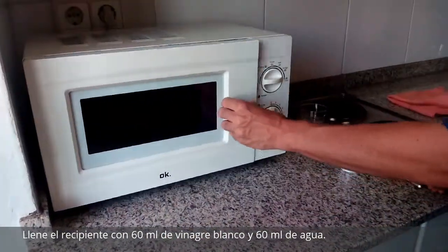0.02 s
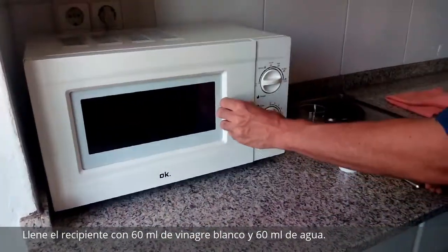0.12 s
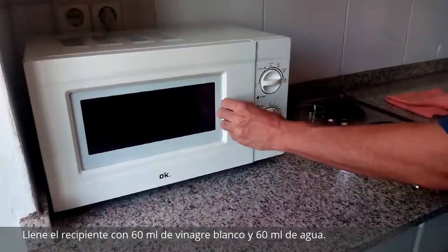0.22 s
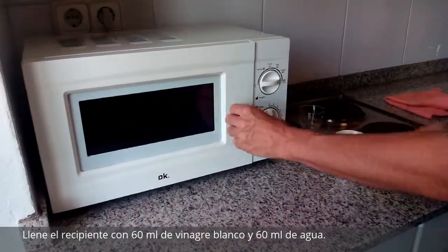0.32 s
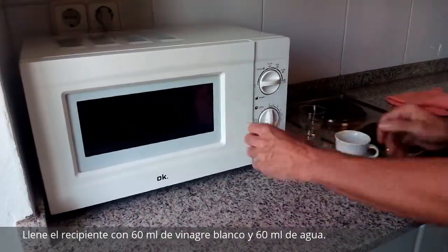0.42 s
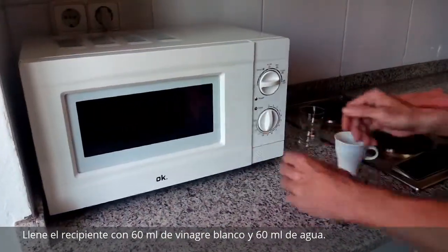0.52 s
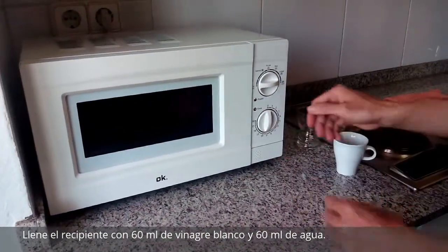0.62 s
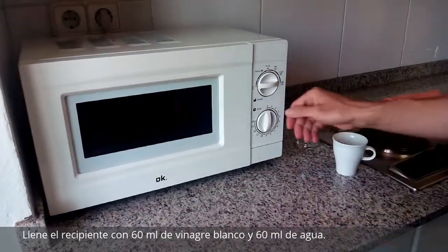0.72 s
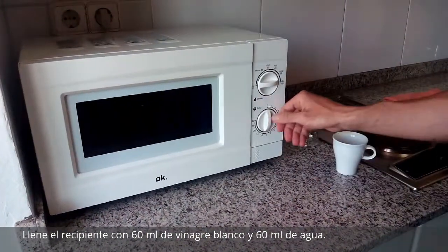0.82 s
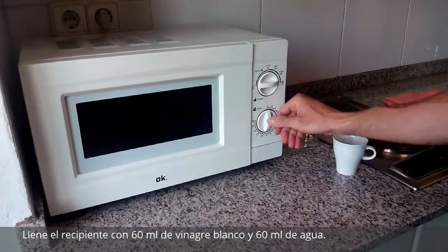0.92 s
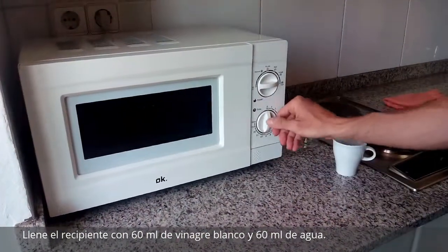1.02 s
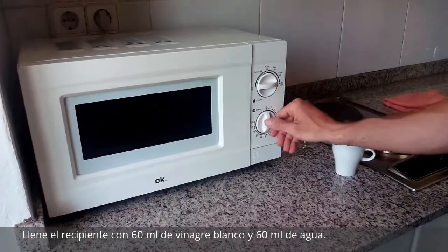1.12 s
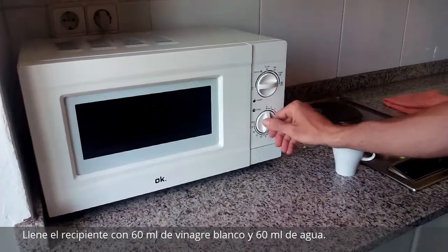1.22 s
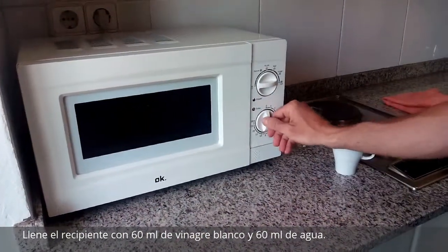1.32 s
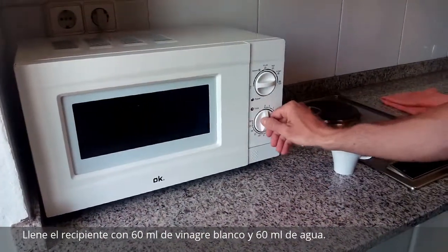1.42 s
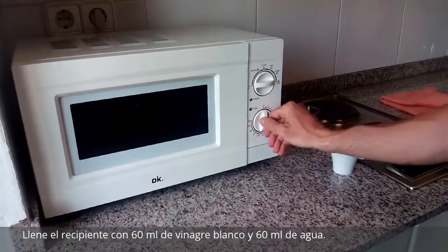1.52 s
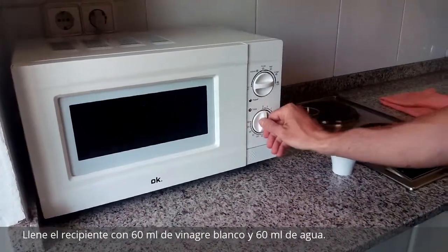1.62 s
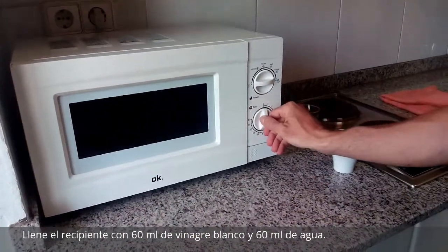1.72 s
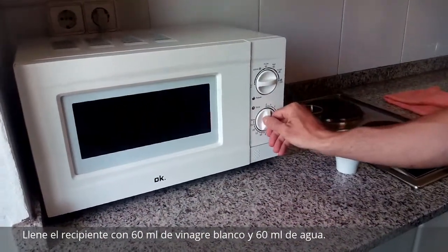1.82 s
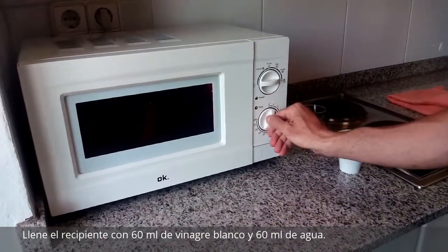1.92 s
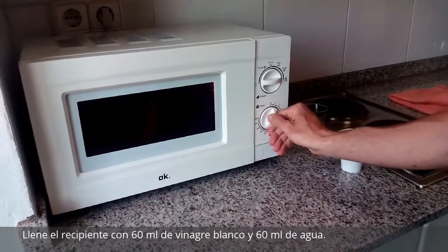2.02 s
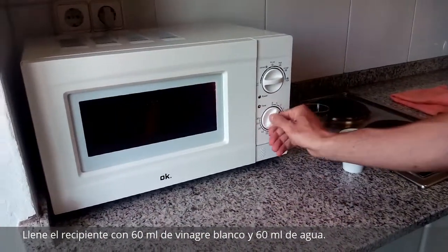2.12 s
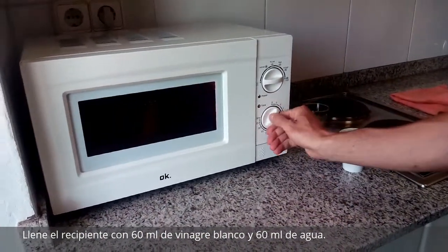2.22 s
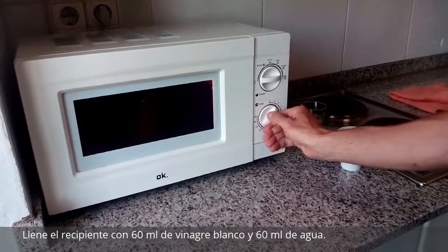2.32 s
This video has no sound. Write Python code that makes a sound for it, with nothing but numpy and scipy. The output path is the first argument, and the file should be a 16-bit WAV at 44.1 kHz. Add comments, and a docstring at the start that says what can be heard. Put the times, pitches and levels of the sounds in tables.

```python
"""The fading tail of an earlier knock is heard first, over the noise floor of a tiled kitchen.
A microwave door is pushed shut: noise cracks for seal and latch, hook knocks, then steel modes ring into the room.
A hand taps the timer knob, rung as plastic modes, and turns it with grainy scraping and noise-burst clicks.
The mains hum, made of sines, and the fan, made of shaped noise, build up. A phone hears it all at two ports."""
import sys
import numpy as np
from scipy import signal
from scipy.fft import rfft, irfft
from scipy.io import wavfile
from scipy.ndimage import uniform_filter1d

SR = 44100
rng = np.random.default_rng(int(sys.argv[2]) if len(sys.argv) > 2 else 0)


def amp(db):
    return 10 ** (np.asarray(db, float) / 20)


def store_pcm(level_fs):
    """Save levels as 16-bit WAV."""
    pcm = np.round(np.clip(level_fs, -1, 1) * 32767).astype(np.int16)
    wavfile.write(sys.argv[1], SR, np.atleast_2d(pcm).T)


N = 105840
HZ = np.fft.rfftfreq(2 * N, 1 / SR)
T = np.arange(N) / SR
PORT_SIGNS = np.array([[1], [-1]])  # left, right
ROOM_BUILD_MS = 2.2

# how the tiled room answers, band by band: centre_hz [Hz], t60_s [s], level_db [dB]
ROOM = [(99.6, 0.48, -3), (250, 0.8, -4.5), (585, 0.53, 2.5), (1378, 0.62, 3), (3050, 0.63, -2.5),
        (5513, 0.61, -0.5), (8100, 0.36, 2), (12360, 0.24, 0.5)]


def curve(table):
    """Table values over all frequencies, joined on a log axis."""
    points = np.array(table, float)
    return np.interp(np.log(HZ + 1), np.log(points[:, 0]), points[:, 1])


def shape(x, gain):
    """Filter by a spectrum."""
    return irfft(rfft(x, 2 * N) * gain, 2 * N)[..., :N]


def set_level(x, db):
    """Scale to an rms of amp(db)."""
    return x * amp(db) / np.sqrt(np.mean(x ** 2))


def hump(hz, octaves):
    """A broad band, bell-shaped in octaves, with a mean power of 1."""
    gain = np.exp(-.5 * (np.log2((HZ + 1) / hz) / octaves) ** 2)
    return gain / np.sqrt(np.mean(gain ** 2))


def decay(t60_s):
    """Amplitude that falls 60 dB in t60_s."""
    return np.exp(-np.log(1000) * T / t60_s)


def ring(modes):
    """Response of a set of modes to one sharp blow: decaying sines of alternating sign."""
    hz, db, t60_s = np.array(modes, float).T[:, :, None]
    sign = (-1.) ** np.arange(len(modes))[:, None]
    return np.sum(sign * amp(db) * np.sin(2 * np.pi * hz * T) * decay(t60_s), axis=0)


def burst(start_s, length_ms):
    """Noise that starts at once and falls 20 dB in its length."""
    age = T - start_s
    fall = np.exp(-np.log(10) * np.abs(age) / (length_ms / 1000))
    return rng.standard_normal(N) * (age >= 0) * fall


def push(start_s, length_ms):
    """A smooth force of area 1."""
    force = np.clip(1 - np.abs(2000 * (T - start_s) / length_ms - 1), 0, 1) ** 2
    return force / force.sum()


def lead(ms):
    """Spectra that bring a sound earlier to the left port."""
    return np.exp(1j * np.pi * HZ * ms / 1000 * PORT_SIGNS)


def diffuse():
    """Noise at the two ports, alike in the bass, less so in the treble."""
    lead_ms = 0.33
    # likeness of diffuse sound at the two ports: frequency_hz [Hz], likeness [0-1]
    likeness = [(30, 0.6), (100, 1), (300, .95), (600, .85), (1200, 0.3), (2500, 0.2), (5000, 0.39),
                (12000, .4)]
    alike = np.clip(curve(likeness), 0, 1)
    mid, side = rng.standard_normal((2, N))
    common = shape(mid, np.sqrt((1 + alike) / 2))
    opposed = PORT_SIGNS * shape(side, np.sqrt((1 - alike) / 2))
    return shape(common + opposed, lead(lead_ms))


def door():
    """Each blow cracks, rattles the latch and pushes the cabinet; gives the cracks and the ringing apart."""
    # blows: start_s [s], crack_db [dB before the crack's tone], crack_length_ms [ms],
    # cabinet_push_db [dB], push_length_ms [ms]
    blows = [(0.1772, -42, 28, -33, 2.73), (0.2188, -35.5, 36, -36, 0.33), (0.2355, -20, 3, -53, 0.24),
             (0.2393, -10, 9.6, -19, 0.63), (0.2482, -6.5, 19, -12, 0.65), (0.2529, -7, 7.4, -11.5, 0.32),
             (0.2614, -11.5, 20.5, -15, 0.63), (0.2713, -21, 12, -20.5, 1.04)]
    # steel cabinet modes: pitch_hz [Hz], level_db [dB], t60_s [s]
    cabinet_modes = [(101, -5, .45), (136, 1, .22), (146, -10, .4), (184, -12, 1.65), (287, 0, .6),
                     (289.2, -1, .6), (423, -9, .25), (541, -1, .12), (630, -3, .12), (655, -8, .08),
                     (749, -10, .08), (818, -4, .1), (988, -9, .08), (1172, -10, .08), (1327, -11, .08)]
    # latch and panel modes rung by the crack: pitch_hz [Hz], relative_level_db [dB], t60_s [s]
    latch_modes = [(1480, -10.5, .02), (1930, -6.5, 0.0091), (2280, 5, 0.0097), (2480, 0, 0.016),
                   (3800, -10.5, 0.0133), (4580, -8.5, 0.035), (5073, -13.5, 0.00498),
                   (5320, -13.5, 0.0093), (6880, -15, 0.004)]
    # latch hooks knocking on their catches: start_s [s], level_db [dB]
    hook_knocks = [(0.2203, -27.5), (0.2392, -16)]
    # hook modes: pitch_hz [Hz], level_db [dB], t60_s [s]
    hook_modes = [(630, -2, .03), (1500, 1, 0.019), (3370, -7, 0.012), (4740, -7.5, 0.0065)]
    dull_hz_ms = 7000  # a longer push dulls the crack: its top times push length
    latch_db, cabinet_low_hz = -11.5, 88

    cracks, force = 0, 0
    for start_s, crack_db, crack_ms, cabinet_db, push_ms in blows:
        dulling = 1 / (1 + (HZ * push_ms / dull_hz_ms) ** 2)
        cracks = cracks + amp(crack_db) * shape(burst(start_s, crack_ms), dulling)
        force = force + amp(cabinet_db) * push(start_s, push_ms)

    knocks = sum(amp(db) * push(start_s, 0.1) for start_s, db in hook_knocks)
    hooks = shape(knocks, rfft(ring(hook_modes), 2 * N))
    latch = rfft(ring(latch_modes), 2 * N)
    latch = latch / np.sqrt(np.mean(np.abs(latch) ** 2))
    rattle = shape(cracks, amp(latch_db) * latch)
    # the box radiates little at the bottom
    radiation = (1j * HZ / (cabinet_low_hz + 1j * HZ)) ** 2
    cabinet = shape(force, rfft(ring(cabinet_modes), 2 * N) * radiation)
    return cracks, hooks + rattle + cabinet


def crack_tone():
    """Tone and overall gain of the door's cracks."""
    # frequency_hz [Hz], relative_level_db [dB]
    colour = [(100, -25.5), (250, -9.5), (600, -1), (1000, -3), (1500, -5), (2400, -8.5), (3300, -11),
              (4600, -11.5), (7000, -23.5), (10000, -37.5), (15000, -33.5)]
    return amp(curve(colour) + 13.5)


def tap():
    """A fingernail touches the plastic knob: a dry noise snap and short pushes that ring its modes."""
    # touches: start_s [s], push_db [dB]
    touches = [(1.1241, -41), (1.1262, -45)]
    # knob modes: pitch_hz [Hz], level_db [dB], t60_s [s]
    knob_modes = [(159, -9.5, 0.093), (539, -12.5, 0.084), (650, -3.5, 0.065), (795, -0.5, 0.053),
                  (1470, -8, 0.022), (1990, -6.5, 0.022), (3440, 2, 0.0087), (3930, 3.5, 0.013),
                  (5092, -14, 0.0051)]
    snap_db, snap_ms, snap_hz, snap_octaves = -12, 7.4, 1790, 0.87  # dB against the push
    nail = sum(amp(db + snap_db) * burst(start_s, snap_ms) for start_s, db in touches)
    snap = shape(nail, hump(snap_hz, snap_octaves))
    force = sum(amp(db) * push(start_s, 0.1) for start_s, db in touches)
    return snap + shape(force, rfft(ring(knob_modes), 2 * N))


def knob():
    """Sparse random grains scrape as the knob turns; timer contacts and gears click as banded bursts."""
    # clicks: start_s [s], level_db [dB], length_ms [ms], centre_hz [Hz], width [octaves]
    timer_clicks = [(1.752, -57, 49, 1085, 0.18), (2.024, -52.5, 68, 750, .5),
                    (2.0198, -58, 9.3, 3420, 0.12), (2.0755, -52.5, 3, 9110, 0.39),
                    (2.0755, -55, 25, 4810, 0.81), (2.096, -50, 9.2, 3320, 0.16),
                    (2.12, -58, 8, 2680, 0.31), (2.1551, -53, 31, 5120, 0.29), (2.158, -52, 35, 2570, 0.68),
                    (2.155, -42.5, 26, 877, 0.3), (2.172, -56, 30, 2600, .9)]
    # loudness of the scrape: time_s [s], level_db [dB]
    scrape_path = [(1.66, -80), (1.76, -70), (1.85, -65), (1.96, -78), (2.03, -64.5), (2.09, -53),
                   (2.14, -59), (2.19, -57), (2.26, -81)]
    scrape_hz, scrape_octaves, grains_per_s = 1300, .9, 3500
    grain_spread_db = 2  # mean of the random boost of each grain

    clicks = 0
    for start_s, db, length_ms, hz, octaves in timer_clicks:
        clicks = clicks + amp(db) * shape(burst(start_s, length_ms), hump(hz, octaves))
    happens = rng.random(N) < grains_per_s / SR
    boost = amp(grain_spread_db * rng.exponential(size=N))
    grains = happens * rng.standard_normal(N) * boost
    scrape = set_level(shape(grains, hump(scrape_hz, scrape_octaves)), 0)
    times_s, levels_db = np.array(scrape_path).T
    path_db = np.interp(T, times_s, levels_db, left=-120, right=-120)
    return clicks + scrape * amp(path_db)


def hum():
    """Sines at mains multiples waver a little and rise to full after switch-on."""
    # multiple [of the mains], level_db [dB rms when full, before the ports], full_s [s]
    partials = [(2, -46, 2.135), (3, -55.5, 2.103), (4, -53, 2.09), (6, -55.5, 2.13), (8, -56.5, 2.14),
                (10, -49, 2.125), (11, -71, 2.15), (20, -68, 2.1)]
    mains_hz, waver_db, rise_db_per_s = 50, 1.1, 215
    out, width = 0, SR // 25  # samples of smoothing
    for multiple, db, full_s in partials:
        drift = uniform_filter1d(uniform_filter1d(rng.standard_normal(N), width), width)
        drift = drift * np.sqrt(1.3 * width)  # back to roughly unit size
        rise_db = rise_db_per_s * np.minimum(T - full_s, 0)
        tone = np.sin(2 * np.pi * (np.round(multiple) * mains_hz * T + rng.random()))
        out = out + np.sqrt(2) * amp(db + waver_db * drift + rise_db) * tone
    return out


def fan():
    """Moving air as shaped diffuse noise that builds up to a steady level."""
    # colour of the air: frequency_hz [Hz], relative_level_db [dB]
    air = [(80, -30), (135, -1), (200, -23), (280, -0.5), (600, -8), (1000, -14), (2200, -23),
           (5000, -29.5), (9000, -52.5)]
    full_db, full_s, rise_db_per_s = -54, 2.08, 202
    steady = set_level(shape(diffuse(), amp(curve(air))), full_db)
    return steady * amp(rise_db_per_s * np.minimum(T - full_s, 0))


def room_bands():
    """The share of each room band over frequency, with its decay time in seconds."""
    centres = np.array(ROOM)[:, 0]
    for k, (_, t60_s, _) in enumerate(ROOM):
        yield curve([(hz, float(j == k)) for j, hz in enumerate(centres)]), t60_s


def fading(x):
    """Each band dies away at the room's own rate."""
    return sum(shape(x, share) * decay(t60_s) for share, t60_s in room_bands())


def room_tone():
    """Level of the room's answer over frequency."""
    return amp(curve(np.array(ROOM)[:, ::2]))


def reverb(x):
    """Dense noise whose bands fill with the energy of x and die away unevenly at the room's rate."""
    patchy_db, patches_per_s = 2, 50
    out, noise = 0, diffuse()
    build = np.exp(-1000 / SR / ROOM_BUILD_MS)
    for share, t60_s in room_bands():
        fade = np.exp(-2 * np.log(1000) / SR / t60_s)  # energy kept per sample
        power = shape(x, share) ** 2 / np.mean(share ** 2)
        poles = np.convolve([1, -fade], [1, -build])
        energy = signal.lfilter([(1 - fade) * (1 - build)], poles, power)
        patches = np.interp(T * patches_per_s, np.arange(N // 100), rng.standard_normal(N // 100))
        out = out + shape(noise, share) * np.sqrt(np.maximum(energy, 0)) * amp(patchy_db * patches)
    return shape(out, room_tone())


def room_build():
    """The echoes thicken over the first milliseconds."""
    return 1 - np.exp(-T * 1000 / ROOM_BUILD_MS)


def tiled_room():
    """Spectrum of the room's response: diffuse noise fading band by band, scaled for its decay time."""
    t60_s = curve(np.array(ROOM)[:, :2])
    gain = room_tone() * np.sqrt(2 * np.log(1000) / SR / t60_s)
    return gain * rfft(fading(diffuse()) * room_build(), 2 * N)


def next_room():
    """Spectrum of the slow dull tail that the next room gives back."""
    gain_db, t60_s, top_hz = -25.5, 2.6, 3000
    tail = diffuse() * room_build() * decay(t60_s) * np.sqrt(2 * np.log(1000) / SR / t60_s)
    return amp(gain_db) * rfft(tail, 2 * N) / (1 + (HZ / top_hz) ** 2)


def direct_path():
    """Spectra of the straight way from the oven: the left port faces it, so hears it earlier."""
    # tilt between the ports: frequency_hz [Hz], left_minus_right_db [dB]
    oven_pan = [(1500, -0.5), (4500, 12), (12000, 3)]
    return lead(0.16) * amp(curve(oven_pan) / 2 * PORT_SIGNS)  # lead in ms


def earlier_knock():
    """The tail of a knock just before, as shaped noise that fades at the room's rates."""
    # frequency_hz [Hz], relative_level_db [dB]
    colour = [(59, -39.5), (100, -7.5), (272, -6.5), (449, -14), (787, -3), (2420, -15.5), (2950, -23.5),
              (3540, -18), (12000, -52.5), (15600, -78), (22000, -120)]
    return fading(set_level(shape(diffuse(), amp(curve(colour))), -38))


def noise_floor():
    """The kitchen's steady floor, as shaped diffuse noise."""
    # frequency_hz [Hz], relative_level_db [dB]
    colour = [(18, -43), (30, -19), (59, -0.5), (114, -8.5), (144, 0.5), (202, -12.5), (277, -6.5),
              (307, -14), (378, -6.5), (409, -9), (546, -11), (746, -8.5), (807, -13.5), (1080, -10),
              (1400, -17), (2550, -19), (3490, -29), (4900, -27), (15500, -65.5)]
    return set_level(shape(diffuse(), amp(curve(colour))), -57)


def scene():
    """The oven's sounds arrive directly and through the tiled room, over the kitchen's floor of noise."""
    # ringing parts face the phone and feed the room less than the crack
    ringing_room_db, tap_room_db, timer_room_db = -9, -9, -3
    far = next_room()
    room = tiled_room() + far
    direct = direct_path()
    cracks, ringing = door()
    crack_sound = shape(shape(cracks, direct + far) + reverb(cracks), crack_tone())
    ringing_sound = shape(ringing, direct + amp(ringing_room_db) * room)
    tap_sound = shape(tap(), direct + amp(tap_room_db) * room)
    timer_sound = shape(knob(), direct + amp(timer_room_db) * room)
    oven = crack_sound + ringing_sound + tap_sound + timer_sound + hum() + fan()
    return oven + earlier_knock() + noise_floor()


def roll_off(x):
    """The treble ends steeply here."""
    return signal.sosfilt(signal.butter(12, 15620, fs=SR, output="sos"), x)


def record(dry):
    """The ports differ in colour and lose the deep bass; peaks beyond full scale clip."""
    # colour of the ports: frequency_hz [Hz], left_minus_right_db [dB]
    port_colour = [(40, 6), (100, 6.5), (300, 3.5), (700, 5), (1300, 0.5), (2400, -4), (4400, 5),
                   (9000, 4.5)]
    left = amp(curve(port_colour) / 2)
    s = 1j * HZ / 31  # low cut at 31 Hz
    ports = shape(dry, np.array([left, 1 / left]) * s / (1 + s))
    return roll_off(np.clip(ports, -1, 1))


dry = scene()
out = record(dry)
store_pcm(out)
```